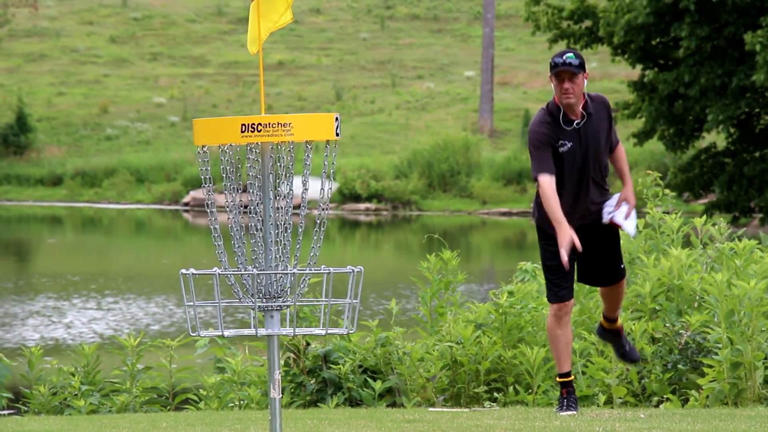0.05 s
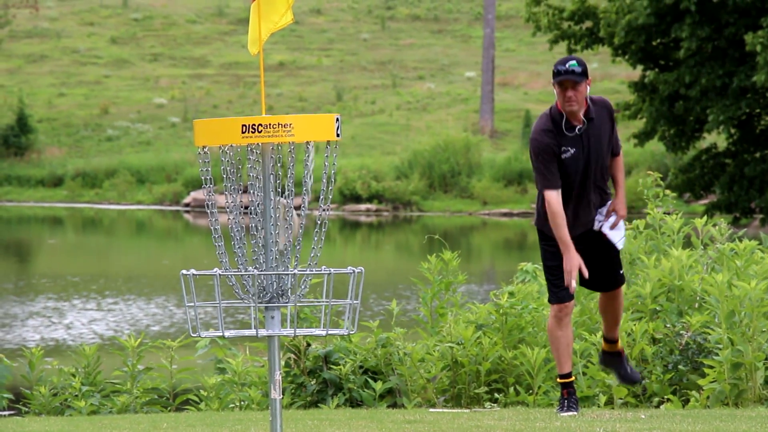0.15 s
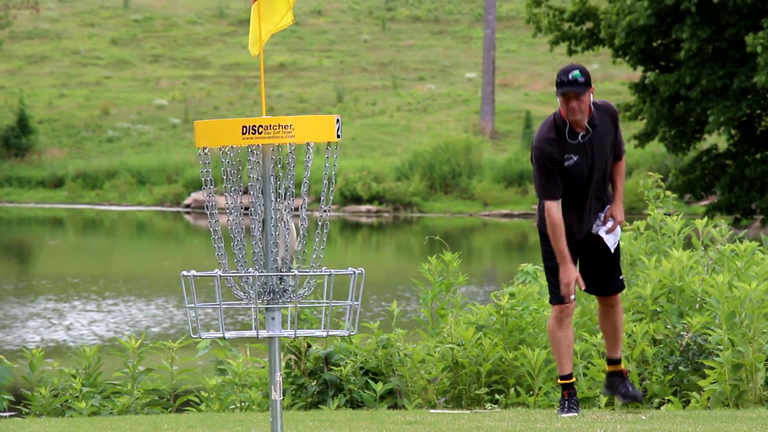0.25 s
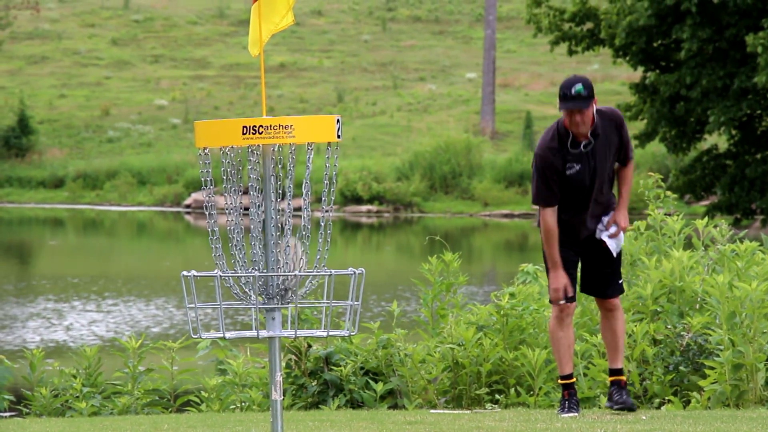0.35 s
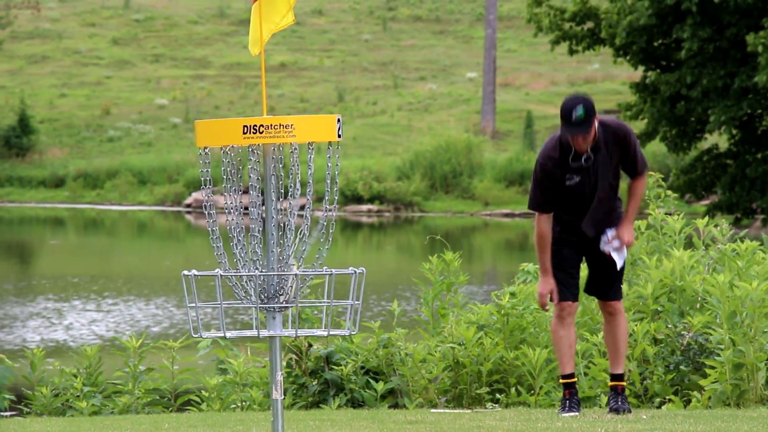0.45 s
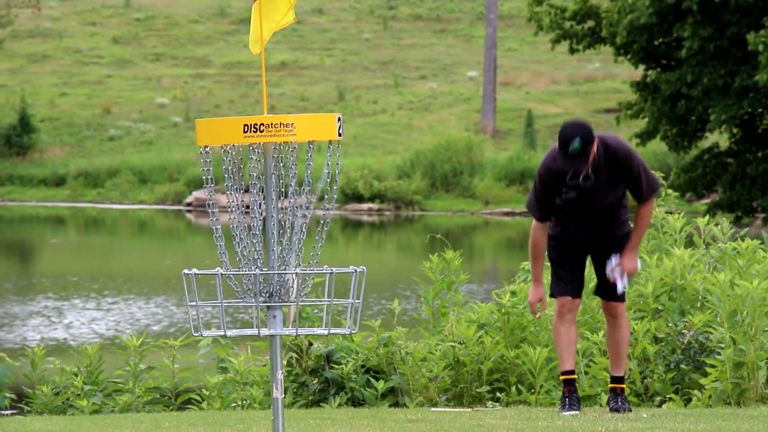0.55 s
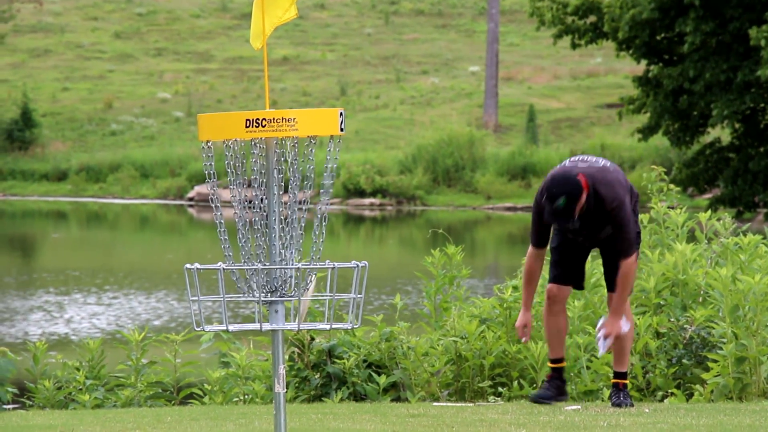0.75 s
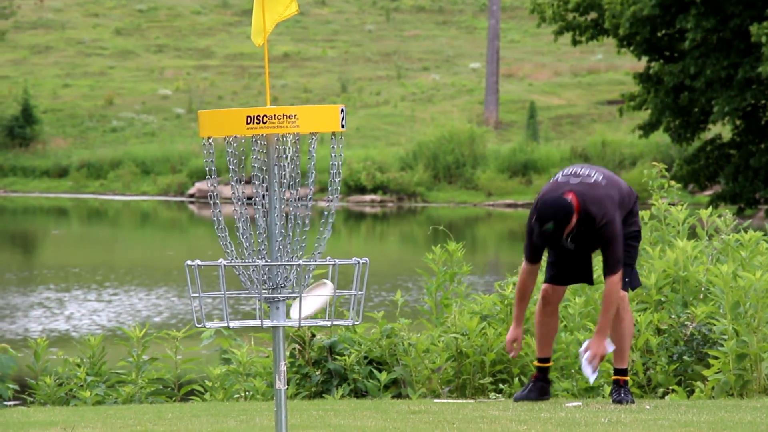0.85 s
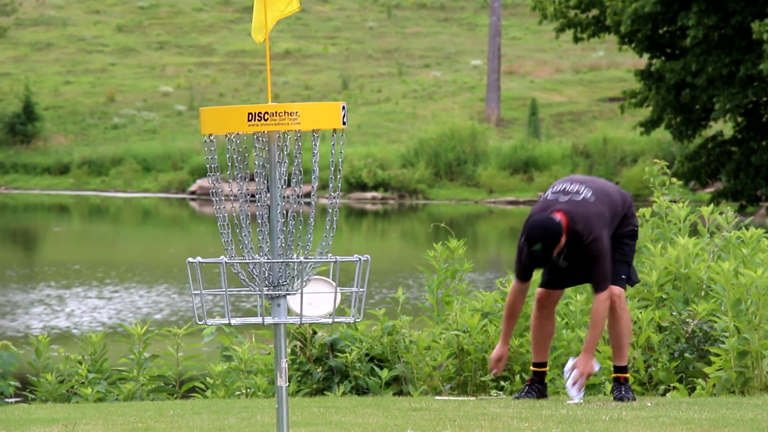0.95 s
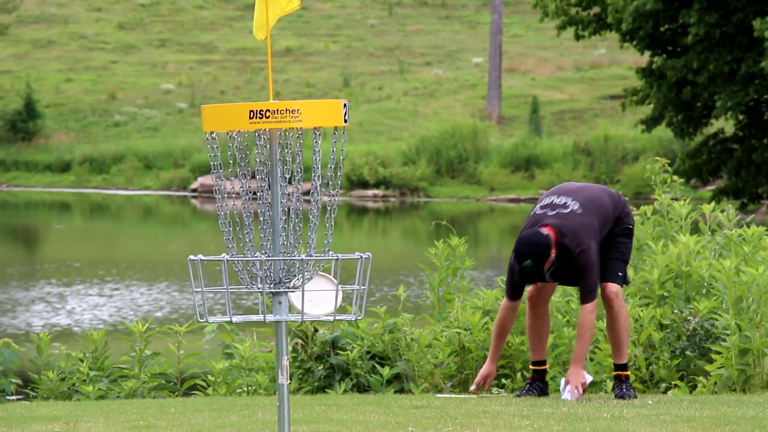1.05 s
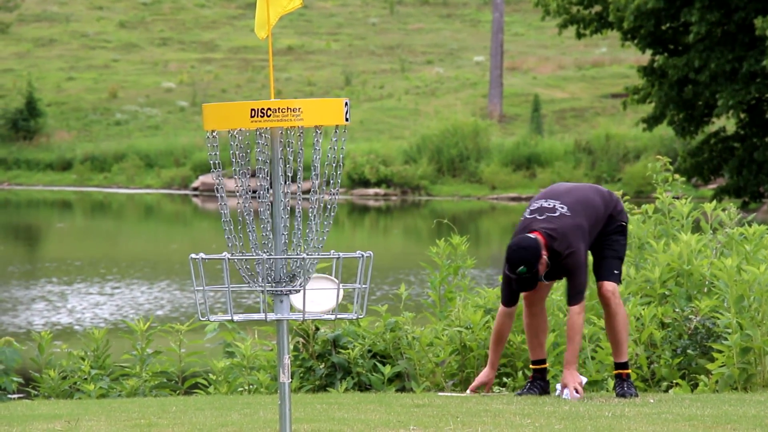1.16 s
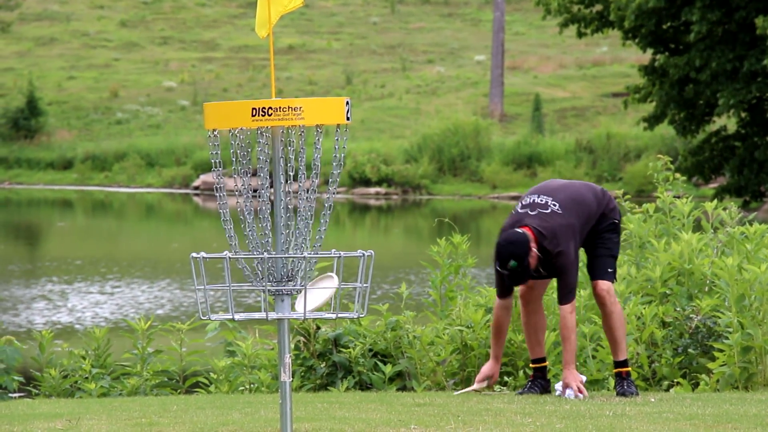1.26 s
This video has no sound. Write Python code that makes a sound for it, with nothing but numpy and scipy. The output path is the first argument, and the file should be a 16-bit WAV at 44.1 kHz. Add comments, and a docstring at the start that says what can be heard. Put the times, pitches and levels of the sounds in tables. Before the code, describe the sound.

Steel chains clash and jingle as a flying disc hits a disc golf basket.

```python
"""A plastic disc flies into the hanging chains of a steel basket, a few metres away beside a pond.
At first there is only a low outdoor rumble and a hiss of air. At 0.2 s the rim smacks into the chains:
they clash, the disc knocks its way down, and the dragged chains set the steel ringing at two clear pitches.
The chains swing back and clash again near 0.7 s, then single links go on tinkling.
Towards the end three dry ticks sound nearby, the second together with a small rising plip."""
import sys
import numpy as np
from scipy import signal
from scipy.fft import rfft, irfft
from scipy.io import wavfile
from scipy.ndimage import uniform_filter1d

SR = 44100
rng = np.random.default_rng(int(sys.argv[2]) if len(sys.argv) > 2 else 0)


def waveform_to_disk(signal):
    """Save audio, clipped to [-1, 1], as 16-bit WAV at the path in sys.argv[1]."""
    frames = np.transpose(np.atleast_2d(signal))
    scaled = np.clip(frames, -1, 1) * 32767
    samples = np.round(scaled).astype(np.int16)
    wavfile.write(sys.argv[1], SR, samples)


N = 57330


def undb(db):
    """Amplitude ratio of a level in decibels."""
    return 10 ** (np.asarray(db) / 20)


def unit(x):
    """Normalisation to rms 1."""
    return x / np.sqrt(np.mean(x ** 2) + 1e-20)


def clock():
    """Time of each sample in seconds."""
    return np.arange(N) / SR


def decay(t, t60):
    """Exponential damping: the level falls 60 dB in t60 seconds."""
    return np.exp(-np.log(1000) * t / t60)


def fade(start, rise, t60):
    """Transient envelope: linear rise, then exponential decay."""
    age = clock() - start
    return np.clip(age / rise, 0, 1) * decay(np.maximum(age - rise, 0), t60)


def burst(t60):
    """Diffuse impulse response: decaying noise of energy 1."""
    noise = rng.standard_normal(N) * decay(clock(), t60)
    return noise / np.linalg.norm(noise)


def ring(x, response):
    """Linear response: the excitation convolved with an impulse response."""
    return signal.fftconvolve(x, response)[:N]


def over_bins(points):
    """Interpolation of (f/Hz, value) rows in log frequency, over the bins of a double-length transform."""
    hz, value = np.array(points, float).T
    return np.interp(np.log(np.arange(N + 1) * SR / (2 * N) + 1), np.log(np.abs(hz) + 1), value)


def colour(x, spectrum):
    """Minimum-phase filter, normalised so that white noise keeps its level."""
    cepstrum = irfft(np.log(unit(undb(over_bins(spectrum)))))
    cepstrum[1:N] *= 2  # folding the cepstrum makes the filter causal
    cepstrum[N + 1:] = 0
    return irfft(rfft(x, 2 * N) * np.exp(rfft(cepstrum)))[:N]


def wander(rate):
    """Random modulation of rms 1, with `rate` new values a second."""
    hold = int(SR / rate)
    steps = np.repeat(rng.standard_normal(N)[:N // hold + 1], hold)
    return unit(uniform_filter1d(steps, hold)[:N])


def pan(db):
    """Gains for a level difference of left over right."""
    return undb(np.array([[db], [-db]]) / 2)


def contacts(per_s, scatter_db=2):
    """Poisson process: random impacts of uneven strength, rms 1."""
    size = undb(scatter_db * np.clip(rng.standard_normal(N), -2, 2)) * rng.choice([-1, 1], N)
    return unit(size * (rng.random(N) < per_s / SR))


# spectra of the rumble and of the open air (f/Hz, relative level/dB)
RUMBLE_SPECTRUM = [(20, -7), (45, -10), (70, -2.5), (90, 2.5), (125, 1.5), (165, -2.5), (220, -14),
                   (400, -40.5), (1500, -60)]
AIR_SPECTRUM = [(25, -2.5), (100, 0.5), (200, -3.5), (350, -2.5), (550, -8), (900, -9.5), (2000, -12),
                (4000, -13.5), (10000, -15.5), (15500, -17)]
def outdoors(rumble_db=-68, air_db=-62):
    """Ambient noise: a distant rumble, largely coherent on both sides, under an incoherent hiss of air."""
    mid, side = (colour(rng.standard_normal(N), RUMBLE_SPECTRUM) for _ in range(2))
    rumble = (mid + .25 * side * np.array([[1], [-1]])) * undb(rumble_db + wander(3.6))
    air = np.array([colour(rng.standard_normal(N), AIR_SPECTRUM) for _ in range(2)])
    return pan(4) * rumble + pan(2.5) * undb(air_db) * air


# nearby ticks (t/s, level/dB, left minus right/dB) and their spectrum (f/Hz, relative level/dB)
DRY_TICKS = [(0.9703, -54, 6), (1.169, -49, 6), (1.2594, -51, 7)]
TICK_SPECTRUM = [(200, -12), (800, 0), (2200, 0), (5000, -2), (7500, -9), (10000, -24), (15000, -32)]
def ticks():
    """Broadband transients: heavily damped bursts of noise are heard as small dry ticks."""
    noise = sum(pan(side) * undb(db) * fade(start, rise=.0003, t60=.0049) * rng.standard_normal((2, N))
                for start, db, side in DRY_TICKS)
    return np.array([colour(channel, TICK_SPECTRUM) for channel in noise])


# spectrum of the rustle after the plip (f/Hz, relative level/dB)
RUSTLE_SPECTRUM = [(200, -16), (600, -4), (1000, -1), (1800, 0), (2600, -3), (3300, -12), (9000, -24)]
def plip(onset_s=1.1694, right_lag_s=.00023, from_hz=400, to_hz=2550, glide_s=.0014):
    """Damped chirp: a plip glides upward and leaves a faint rustle; time and level cues place it left."""
    channels = []
    for start in (onset_s, onset_s + right_lag_s):
        age = np.maximum(clock() - start, 0)
        hz = to_hz + (from_hz - to_hz) * np.exp(-age / glide_s)
        phase = 2 * np.pi * np.cumsum(hz * (age > 0)) / SR
        chirp = undb(-37) * fade(start, rise=.0026, t60=.009) * np.sin(phase)
        tail = undb(-54) * fade(start, rise=.0016, t60=.04)
        rustle = undb(-64) * fade(start, rise=.0026, t60=.75)
        channels.append(chirp + colour((tail + rustle) * contacts(per_s=2700), RUSTLE_SPECTRUM))
    return pan(7) * np.array(channels)


# spectrum of steel links striking each other (f/Hz, relative level/dB)
CHAIN_SPECTRUM = [(300, -27), (900, -7), (2000, -7.5), (3200, -7), (4800, 3), (7000, 2), (10500, 1.5),
                  (13000, 5.5), (14200, -14), (16000, -30)]
def chain_timbre(x):
    """Spectral envelope: contacts between links radiate mostly in the treble."""
    return colour(x, CHAIN_SPECTRUM)


# clinks of single links (t/s, level/dB, f/Hz)
LINK_CLINKS = [(0.222, -48, 8850), (0.252, -49, 8850), (0.268, -34, 12100), (0.424, -40, 12250),
               (0.505, -46.5, 8920), (0.530, -41.5, 11950), (0.598, -66, 11450), (0.694, -48, 8520),
               (0.754, -65, 11700), (0.823, -46, 11890), (0.881, -54, 11850), (0.938, -51, 11950),
               (0.994, -55.5, 8850), (1.004, -50.5, 11660), (1.062, -54, 12300), (1.085, -48.5, 11800),
               (1.123, -58, 8800), (1.143, -47, 11950), (1.156, -46.5, 12050), (1.24, -52, 8950)]
def clinks(links=3, stagger_s=.0074, spread_hz=130):
    """Beating: after a tiny tick, a few links ring one after another at nearly the same frequency."""
    t, tones, touch = clock(), 0, 0
    for onset, db, hz in LINK_CLINKS:
        for k, (detune, turn) in enumerate(rng.random((links, 2))):
            start = onset + stagger_s * k * (.5 + turn)
            pitch = hz + spread_hz * (2 * detune - 1) * min(k, 1)
            envelope = undb(db) / (1 + k) * fade(start, rise=.0024, t60=.049)
            tones = tones + envelope * np.sin(2 * np.pi * (pitch * t + turn))
        touch = touch + undb(db - 16) * fade(onset, rise=.00064, t60=.072)
    return tones + chain_timbre(touch * rng.standard_normal(N))


# pushes of the chains on the steel (t/s, duration/s, low tone level/dB, high tone level/dB)
STEEL_PUSHES = [(0.201, .006, -53.5, -45), (0.243, 0.027, -54.5, -44.5), (0.289, 0.0052, -40, -47),
                (0.301, 0.017, -40, -34.5), (0.333, 0.015, -48.5, -51), (0.457, 0.0049, -48.5, -56.5),
                (0.47, 0.029, -44, -51.5), (0.694, 0.019, -57, -60), (0.742, 0.022, -66.5, -63),
                (0.806, 0.066, -73.5, -64.5), (1.147, 0.0076, -59.5, -55)]
# modes of the low and of the high tone (f/Hz, relative level/dB, T60/s)
LOW_MODES = [(4371.5, 0, .31), (4334, -16, .31)]
HIGH_MODES = [(12061, 0, .15), (11955, -8, .3), (11900, -14, .3), (12100, -14, .15)]
def singing_steel(waver_db=2.6, waver_hz=69.86):
    """Resonance: chains dragged over the basket's steel build up two clear tones, which decay freely."""
    t, tones = clock(), 0
    for k, modes in enumerate((LOW_MODES, HIGH_MODES)):
        for hz, db, t60 in modes:
            swell = sum(undb(dbs[k]) * fade(start, length, t60) for start, length, *dbs in STEEL_PUSHES)
            gain = undb(db + waver_db * wander(waver_hz))
            tones = tones + gain * swell * np.sin(2 * np.pi * (hz * t + rng.random()))
    return np.sqrt(2) * tones


# knocks of the disc on chains, pole and basket (t/s, level/dB, T60/s)
DISC_KNOCKS = [(0.199, -45.5, 0.076), (0.23, -50.5, 0.074), (0.258, -50, 0.15), (0.286, -51.5, 0.074),
               (0.332, -64.5, 1), (0.456, -58, 0.048), (0.492, -67.5, 0.13), (0.633, -65, 0.24)]
# spectra of the disc's clatter and of its first smack (f/Hz, relative level/dB)
CLATTER_SPECTRUM = [(200, -19.5), (480, -15.5), (720, 0.5), (920, -4), (1350, -9.5), (1730, -2.5),
                    (2200, -12), (2850, -4.5), (4000, -10), (9000, -40)]
SMACK_SPECTRUM = [(500, -20), (1000, -17), (1700, 6.5), (2800, 3), (4000, 3), (9000, -23)]
def disc(strands=8):
    """Impact excitation: the plastic rim smacks, then clatters; each strand has its own response."""
    force = sum(undb(db) * fade(start, .00033, t60) for start, db, t60 in DISC_KNOCKS)
    smack = undb(-47) * fade(DISC_KNOCKS[0][0], rise=.00036, t60=.06) * contacts(per_s=6000)
    clatter = sum(ring(force * contacts(per_s=1800 / strands), burst(t60=.014)) for _ in range(strands))
    return colour(clatter / np.sqrt(strands), CLATTER_SPECTRUM) + colour(smack, SMACK_SPECTRUM)


# surges of chain contacts (t/s, level/dB, rise/s, T60/s)
CHAIN_SURGES = [(0.1984, -39, 0.0036, 0.049), (0.204, -49.5, .003, 0.76), (0.286, -42.5, 0.0094, 0.13),
                (0.345, -63, 0.09, 0.98), (0.456, -58, 0.0093, 0.39), (0.612, -60.5, 0.014, 0.45),
                (0.662, -44, 0.0018, 0.053), (0.7125, -54, 0.0019, 0.16), (0.9925, -59, 0.0018, 0.13),
                (1.056, -65.5, 0.0025, 0.11)]
def agitation():
    """Incoherent addition: the surges sum in power and set how hard the links collide."""
    return np.sqrt(sum((undb(db) * fade(start, rise, t60)) ** 2 for start, db, rise, t60 in CHAIN_SURGES))


# modes of a chain link (f/Hz, spread between links/Hz, relative level/dB, T60/s)
LINK_MODES = [(1730, 32.6, -19.5, 0.52), (4614, 220, -6, 0.15), (6710, 82, -10, 0.075),
              (8930, 110, -8, 0.16), (11850, 61.5, -4, 0.16), (11700, 45, -2.5, 0.12),
              (12100, 390, -5.5, .15), (12800, 35, -6, 0.42), (13650, 60, -22, 0.072)]
def jingle(links=16, hits_per_s=860):
    """Modal vibration: links, each tuned a little differently, ring in the clashes and as chains sway."""
    t, ringing = clock()[:N // 3], 0
    sway = undb(-56) * fade(CHAIN_SURGES[0][0], rise=.0044, t60=4.4)
    force = np.hypot(undb(1.5) * agitation(), sway)
    for _ in range(links):
        link = 0
        for hz, spread, db, t60 in LINK_MODES:
            pitch = hz + spread * rng.standard_normal()
            link = link + undb(db) * np.sin(2 * np.pi * pitch * t) * decay(t, t60)
        ringing = ringing + ring(force * contacts(hits_per_s / links), link / np.linalg.norm(link))
    return ringing / np.sqrt(links)


def clash(strands=6, hits_per_s=1300, shimmer_db=-.5):
    """Impulse response: each collision of strands cracks and leaves a short shimmer of many partials."""
    t, collisions = clock()[:N // 4], 0
    force = agitation()
    for _ in range(strands):
        partials = sum(np.sin(2 * np.pi * hz * t) for hz in rng.uniform(1500, 15000, size=40))
        response = partials * decay(t, t60=.099)
        hits = force * contacts(hits_per_s / strands)
        crack = ring(hits, burst(t60=.0037))
        shimmer = undb(shimmer_db) * ring(hits, response / np.linalg.norm(response))
        collisions = collisions + crack + shimmer
    return chain_timbre(collisions / np.sqrt(strands))


# level difference of the basket's sound between the two sides (f/Hz, left minus right/dB)
LEVEL_DIFFERENCE = [(700, 0), (2400, 1), (4400, -3.5), (6000, 0), (8100, 4.5), (12000, 9), (15000, -17)]
# phase difference of its direct sound (f/Hz, lead of left/rad)
PHASE_DIFFERENCE = [(500, 0), (4400, .2), (7200, 1), (9700, 1.7), (11300, 4.3), (14000, 4.7)]
def scene(scatter_db=-5, scatter_t60_s=.29):
    """Superposition: the basket, direct and scattered by ground and bushes, adds to its surroundings."""
    rattle = clash() + jingle() + disc()
    basket = rattle + clinks() + singing_steel()
    channels = []
    for sign in (1, -1):  # left, right
        direct = rfft(basket, 2 * N) * np.exp(.5j * sign * over_bins(PHASE_DIFFERENCE))
        scattered = undb(scatter_db) * rfft(ring(rattle, burst(scatter_t60_s)), 2 * N)
        balance = undb(sign * over_bins(LEVEL_DIFFERENCE) / 2)
        channels.append(irfft((direct + scattered) * balance)[:N])
    return np.array(channels) + ticks() + plip() + outdoors()


def record(dry):
    """Band limiting: a steep elliptic low-pass removes the treble above 15.4 kHz."""
    return signal.sosfilt(signal.ellip(10, .2, 80, 15400, fs=SR, output="sos"), dry)


dry = scene()
out = record(dry)
waveform_to_disk(out)
```